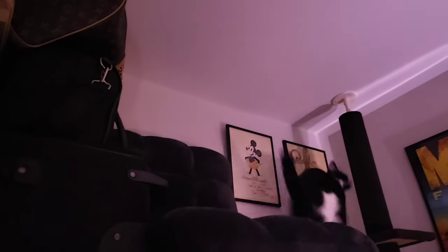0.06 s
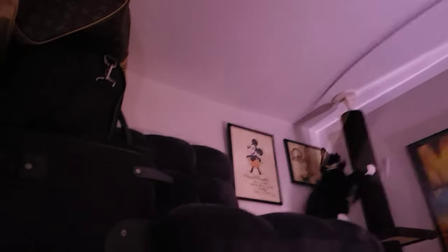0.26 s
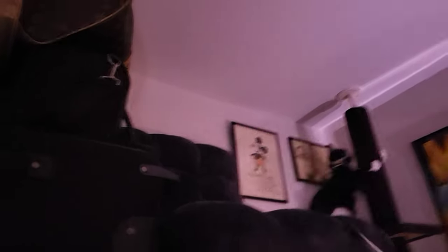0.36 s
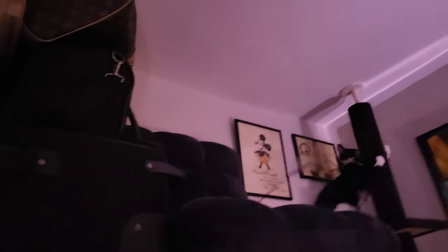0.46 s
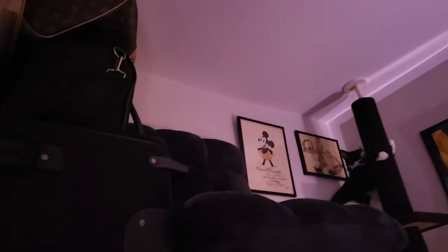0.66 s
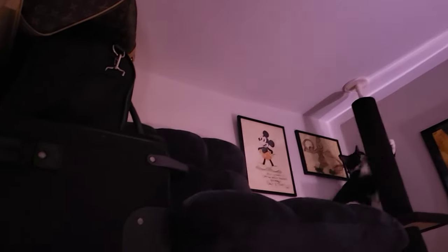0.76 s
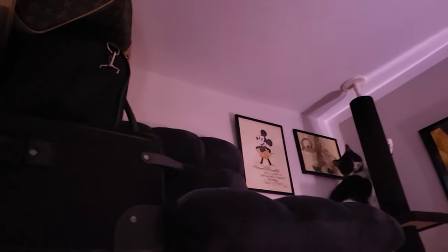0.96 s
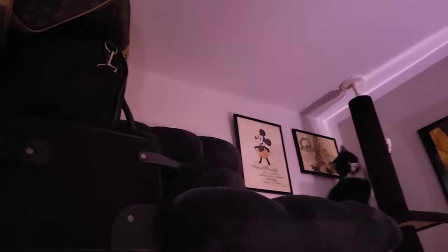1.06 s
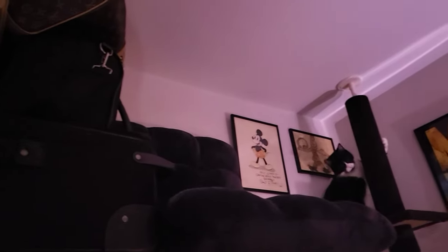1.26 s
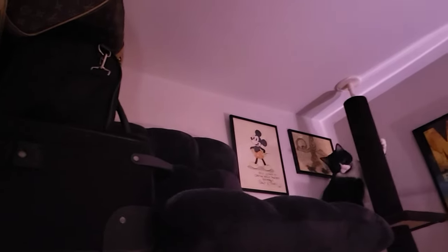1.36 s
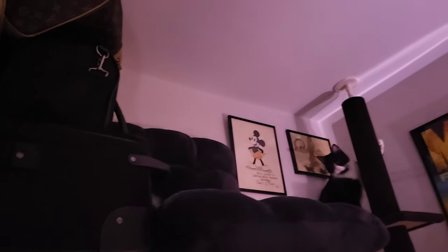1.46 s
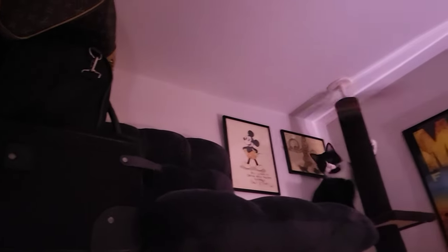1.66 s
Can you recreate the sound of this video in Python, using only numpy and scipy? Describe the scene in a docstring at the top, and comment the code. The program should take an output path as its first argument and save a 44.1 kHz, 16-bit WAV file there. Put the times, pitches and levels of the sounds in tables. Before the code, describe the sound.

A cat's paw knocks hard on a carpeted pole, then light claw taps and a scrape

```python
"""Steady room noise and a wavering hum (filtered noise) lie under a cat on a sofa back in a living room.
First come faint claw ticks (ringing clicks), then one hard knock on a carpeted pole (driven damped modes).
Low thumps (swelling sines) and dull noise bands follow as pole and sofa sway and the cat's weight shifts;
fur and cloth rustle (grainy noise), claws tick again and light taps ring a hollow part (damped modes).
Late on comes a short scrape (grainy noise with ringing catches). Two microphones hear it all."""
import sys
import numpy as np
from scipy import signal
from scipy.fft import rfft, irfft, next_fast_len
from scipy.io import wavfile

SR = 44100
rng = np.random.default_rng(int(sys.argv[2]) if len(sys.argv) > 2 else 0)


def generate_wav(sig):
    """Save sig (samples, or channels by samples) to the path in sys.argv[1] as 16-bit PCM at SR."""
    pcm = np.round(np.clip(np.atleast_2d(sig).T, -1, 1) * 32767).astype(np.int16)
    wavfile.write(sys.argv[1], SR, pcm)


def ratio_of_db(decibels):
    """Turn decibels (scalar or array-like) into linear amplitude factors; 0 dB maps to 1."""
    return 10 ** (np.asarray(decibels, float) / 20)


N = 74970

# spectrum of the room noise: f/Hz, relative level/dB
HUSH_SPECTRUM = [(18, -41), (30, 10.5), (48, -1), (93, -27.5), (137, -3.5), (173, -25), (225, -31.5),
                 (401, -12), (495, -33), (714, -22), (1240, -44.5), (1370, -27.5), (1610, -48.5),
                 (2320, -33.5), (7540, -46), (8600, -47.5), (15700, -40)]
# likeness of the room noise at the two microphones: f/Hz, left-right correlation/1
HUSH_LIKENESS = [(60, -0.12), (180, -0.15), (550, -0.86), (1650, 0.68), (4970, -0.24), (15000, -0.82)]
# resonances of the hum: f/Hz, rms level/dB, bandwidth/Hz
HUM = [(39, -70, 7), (134, -70, 6)]
# weight shifting in the cushions: t/s, bass level before trim/dB, low middle level before trim/dB
WEIGHT = [(0.0, -102, -52.5), (0.074, -83, -67), (0.112, -68.5, -101), (0.157, -55, -43.5),
          (0.196, -68, -52.5), (0.218, -30, -25), (0.264, -29, -37.5), (0.287, -33, -38),
          (0.364, -46, -67.5), (0.404, -48, -42), (0.448, -83, -71.5), (0.506, -58, -83.5),
          (0.572, -43, -51), (0.65, -62.5, -99), (0.688, -39, -53.5), (0.718, -47.5, -55),
          (0.766, -57.5, -64), (0.891, -81.5, -70.5), (1.102, -70, -79.5), (1.13, -79, -53.5),
          (1.178, -74, -71), (1.496, -63.5, -81), (1.551, -44.5, -49.5), (1.595, -57, -50),
          (1.666, -83, -72), (1.7, -69, -91)]
# low swings of pole and sofa frame: centre t/s, length/s, peak level/dB, f/Hz
SWAYS = [(0.01, 0.082, -47, 39.6), (0.045, 0.046, -56, 119), (0.07, 0.031, -46, 51),
         (0.164, 0.015, -51, 308), (0.23, 0.029, -32, 229), (0.244, 0.034, -32.5, 108),
         (0.252, 0.02, -22, 59), (0.276, 0.047, -19, 49.6), (0.285, 0.036, -35, 246),
         (0.288, 0.028, -31.5, 106), (0.319, 0.057, -46.5, 234), (0.347, 0.072, -27, 41.6),
         (0.403, 0.047, -46.5, 273.5), (0.418, 0.023, -40.5, 45), (0.457, 0.018, -60.5, 287),
         (0.565, 0.021, -49, 146), (0.595, 0.079, -53.5, 128), (0.597, 0.22, -46.5, 41.6),
         (0.63, 0.046, -66, 130.6), (0.689, 0.02, -53, 328.4), (0.721, 0.1, -51, 103.7),
         (0.764, 0.079, -60, 284), (0.776, 0.078, -57, 45), (0.84, 0.15, -69, 355.4),
         (1.127, 0.014, -59, 410), (1.142, 0.025, -70, 387), (1.564, 0.062, -61, 111)]
# faint creaks: centre t/s, length/s, peak level/dB, f/Hz
CREAKS = [(.546, .02, -64, 780), (.562, .025, -63, 600), (1.137, .03, -74, 2300), (1.3, .05, -76, 700),
          (1.315, .08, -75, 1400), (1.42, .06, -80, 750)]
# fur and cloth rubbing: t/s, middle level/dB, top level/dB, treble level/dB
RUB = [(0, -75.5, -91, -94), (.02, -66.5, -61.5, -76), (.04, -74.5, -68, -71), (.075, -84, -82.5, -85),
       (.14, -78, -80, -88), (.157, -64, -73.5, -80.5), (.211, -54.5, -56.5, -71.5),
       (.222, -26.5, -38, -61.5), (.245, -39, -53.5, -63), (.29, -47.5, -54, -68), (.31, -65.5, -70.5, -81),
       (.355, -64, -67, -93), (.378, -66.5, -72.5, -90.5), (.395, -63, -65, -73.5),
       (.43, -74, -88.5, -87.5), (.55, -68, -85, -89.5), (.575, -76.5, -97.5, -98),
       (.65, -76.5, -82.5, -79), (.69, -73.5, -71, -80), (.73, -72, -80, -74.5), (.755, -60.5, -66, -69.5),
       (.81, -86, -100, -100), (1.1, -86, -99, -104), (1.122, -63, -78.5, -94), (1.175, -90, -100, -102),
       (1.3, -79, -88.5, -89), (1.5, -81, -80.5, -80.5)]
# spectra of the rubbing in its middle, top and treble: f/Hz, relative level/dB per Hz
RUB_MIDDLE = [(240, -33), (400, -18.5), (671, 0.5), (900, -1), (1500, 5), (2400, 4), (3500, -3),
              (4550, -34), (7700, -120)]
RUB_TOP = [(1760, -35.5), (3000, -19), (3780, -0.5), (4360, -9.5), (8500, -16), (11000, -47.5),
           (18700, -120)]
RUB_TREBLE = [(4710, -28), (8000, -3), (10100, -12.5), (14800, -7), (16000, -18.5)]
# the scrape: t/s, middle level/dB, top level/dB, treble level/dB
SCRAPE = [(1.508, -76, -91, -101), (1.5168, -58, -60, -73.5), (1.518, -40, -45, -53),
          (1.528, -46, -40, -57.5), (1.532, -51, -42, -53), (1.557, -47.5, -49, -47.5),
          (1.569, -43, -48.5, -47.5), (1.58, -54.5, -48.5, -59), (1.587, -47, -55.5, -50),
          (1.6, -58.5, -55.5, -54.5), (1.63, -71, -65.5, -70), (1.67, -116, -103, -99)]
# spectra of the scrape in its middle, top and treble: f/Hz, relative level/dB per Hz
SCRAPE_MIDDLE = [(150, -18.5), (250, -20), (606, -6.5), (774, -9), (1600, -1), (2090, -1.5), (2970, 2.5),
                 (3200, -17), (4160, -50.5), (7040, -120)]
SCRAPE_TOP = [(2000, -29), (3100, -6.5), (4000, -0.5), (5100, -6.5), (6100, -9), (8500, -20.5),
              (11000, -39.5)]
SCRAPE_TREBLE = [(4710, -37), (8000, -6.5), (9210, -10), (10100, -10.5), (13500, 2.5), (15700, -4)]
# catches in the scrape: t/s, peak level/dB, f/Hz, decay time t60/s
CATCHES = [(1.5176, -40, 3500, .012), (1.521, -40, 2500, .015), (1.5244, -29, 3750, .016),
           (1.5246, -37, 6000, .012), (1.525, -39, 2450, .015), (1.535, -42, 1200, .02),
           (1.543, -42, 1250, .02), (1.561, -41, 3300, .015), (1.5645, -41, 1700, .02),
           (1.568, -38, 1450, .022), (1.5838, -36, 1600, .025), (1.587, -41, 1500, .025),
           (1.592, -42, 1900, .025), (1.612, -50, 1800, .025)]
# light taps on a hollow part: t/s, level/dB, then the relative level/dB of each tap mode
TAPS = [(0.597, -67.5, -20, -8, -6.5, 4.5, -12.5), (0.6779, -57.5, -20, -17, -3.5, -13.5, -11),
        (0.7025, -52, -26.5, -19, -15, -1.5, -1.5), (0.7365, -44, -9, -4.5, -9.5, -8.5, 0),
        (0.7554, -59.5, -24, 4.5, -17, -16, -11), (1.119, -60, -3, -41, 1, 5.5, 5.5)]
# modes of the hollow part: f/Hz, decay time t60/s
TAP_MODES = [(775, 0.036), (1160, 0.022), (1335, 0.047), (1560, 0.031), (2120, 0.019)]
# claw ticks: t/s, level/dB, f/Hz
TICKS = [(0.021, -40, 5600), (0.028, -45.5, 7800), (0.032, -52, 9400), (0.402, -51.5, 13400),
         (0.6527, -61.5, 11860), (0.6646, -37, 12500), (0.674, -39, 11020), (0.7012, -53, 13000),
         (0.7093, -53, 11200), (0.736, -52, 13850), (0.7527, -46.5, 12070), (0.7744, -63, 13500),
         (0.8372, -66, 11870), (1.121, -81, 11880)]
# small body under each tick: f/Hz, level relative to the tick/dB, decay time t60/s
TICK_BODY = [(3400, -19, .022), (5800, -22, .005), (15000, -8, .0025)]
# knocks on the pole: t/s, level/dB, contact build-up/s, favoured f/Hz
KNOCKS = [(0.016, -56, 0.0016, 780), (0.152, -56.5, 0.0031, 900), (0.2141, -9, 0.0011, 1400),
          (0.383, -43, 0.0015, 794), (0.946, -73.5, 0.0025, 2300)]
# modes of the pole: f/Hz, relative level/dB, decay time t60/s
POLE_MODES = [(790, -12, .025), (1030, -1, .024), (1165, -2, .028), (1325, 0, .034), (1575, 1, .028),
              (1755, -2, .025), (2150, -7, .02), (2550, -5, .014), (3280, -1, .013), (3500, 0, .011),
              (3950, -5, .009), (5000, -14, .008), (5800, -13, .009), (6700, -15, .008)]


def rms_one(x):
    """Normalisation: scale a signal to unit rms."""
    return x / np.sqrt(np.mean(x ** 2) + 1e-20)


def in_time(rows):
    """Linear interpolation: read each column of a time table at every sample."""
    s, *columns = np.transpose(rows)
    return [np.interp(np.arange(N) / SR, s, column) for column in columns]


def at_hz(points, hz):
    """Interpolation of a spectrum table on a logarithmic frequency axis."""
    table_hz, values = np.transpose(points)
    return np.interp(np.log(hz), np.log(table_hz), values)


def bin_hz():
    """Frequencies of the Fourier bins, the lowest raised to 1 Hz."""
    return np.maximum(np.arange(N // 2 + 1) * SR / N, 1)


def colour(x, spectrum):
    """Linear filtering: weight the Fourier spectrum, then scale to unit rms."""
    return rms_one(irfft(rfft(x) * ratio_of_db(at_hz(spectrum, bin_hz())), N))


def band_filter(x, order, edges_hz, kind):
    """Butterworth filtering: a maximally flat pass band."""
    return signal.sosfilt(signal.butter(order, edges_hz, kind, fs=SR, output="sos"), x)


def ring(x, hz, t60):
    """Damped resonator: a unit click sets a decaying sine of initial height 1 ringing."""
    r, w = ratio_of_db(-60 / (t60 * SR)), 2 * np.pi * hz / SR
    return signal.lfilter([0, np.sin(w)], [1, -2 * r * np.cos(w), r * r], x + 1e-18)


def contact(t, build_s):
    """Contact force of an impact: quick rise to 1, quick fall."""
    return (t / build_s * np.exp(1 - t / build_s)) ** 2


def push_ring(push, t, hz, t60):
    """Driven resonance: a mode swells during the contact, then decays; peak 1, random phase."""
    drive = push * np.sin(2 * np.pi * (hz * t + rng.random()))
    y = ring(drive, hz, t60)
    return y / np.abs(y).max()


def click(s, db):
    """Impulse excitation: one sample of the given level."""
    return ratio_of_db(db) * (np.arange(N) == int(s * SR))


def grains(per_s, spread_db, bed):
    """Stick-slip friction: random clicks of uneven size over a bed of noise."""
    sizes = ratio_of_db(spread_db * np.minimum(rng.exponential(1, N), 5)) * rng.choice([-1, 1], N)
    slips = rng.random(N) < per_s / SR
    return rms_one(sizes * slips) + bed * rng.standard_normal(N)


def rustle(curve, spectra, per_s, spread_db):
    """Friction noise: independent grains in the middle, top and treble, each with its own level curve."""
    return sum(ratio_of_db(db) * colour(grains(per_s, spread_db, bed=.75), spectrum)
               for db, spectrum in zip(in_time(curve), spectra))


def swells(rows):
    """Amplitude modulation: each sine swells and fades under a squared cosine."""
    t = np.arange(N) / SR
    out = np.zeros(N)
    for s, length_s, db, hz in rows:
        swell = np.cos(np.pi * np.clip((t - s) / length_s, -.5, .5)) ** 2
        out += ratio_of_db(db) * swell * np.sin(2 * np.pi * hz * (t - s))
    return out


def pair(x, lag_s, pan_db):
    """Arrival-time and level difference: positive values make the left later and louder."""
    t = np.arange(N)
    left = np.interp(t - lag_s * SR, t, x)
    return np.array([left * ratio_of_db(pan_db / 2), x * ratio_of_db(-pan_db / 2)])


def hush():
    """Partial coherence: steady noise with a set left-right likeness, plus a hum of resonated noise."""
    level_db = -64.5
    mid, side = rfft(rng.standard_normal((2, N)))
    alike = np.clip(at_hz(HUSH_LIKENESS, bin_hz()), -1, 1)
    both = np.sqrt(1 + alike) * mid + np.sqrt(1 - alike) * side * [[1], [-1]]
    noise = rms_one(irfft(both * ratio_of_db(at_hz(HUSH_SPECTRUM, bin_hz())), N))
    # a narrow resonance driven by noise wavers in level
    hum = sum(ratio_of_db(db) * rms_one(ring(rng.standard_normal(N), hz, 0.81 / width_hz))
              for hz, db, width_hz in HUM)
    return ratio_of_db(level_db) * noise + hum


def room(x):
    """Reverberation: ten feedback delays a side, duller on every round."""
    t60_s, wall_cut_hz = 0.16, 4000
    size = next_fast_len(N + SR)
    w = 2 * np.pi * np.arange(size // 2 + 1) / size
    dull = 1 / (1 + 1j * w * SR / (2 * np.pi * wall_cut_hz)) ** 0.1
    out = np.zeros((2, len(w)), complex)
    for k, lag in enumerate(rng.uniform(0.0033, 0.033, 20) * SR):
        loop = ratio_of_db(-60 * lag / SR / t60_s) * dull * np.exp(-1j * w * lag)
        out[k % 2] += loop / (1 - loop) * (-1) ** (k // 2)  # alternate signs
    return irfft(out * rfft(x, size), size)[:, :N]


def weight():
    """Band-limited noise: dull lumps from the upholstery as the cat's weight shifts."""
    trim_db, bands_hz = -11, ([60., 154.0], [180., 424.0])
    return sum(ratio_of_db(db + trim_db) * rms_one(band_filter(rng.standard_normal(N), 2, edges_hz, "band"))
               for db, edges_hz in zip(in_time(WEIGHT), bands_hz))


def sways():
    """Low-frequency oscillation: pole and sofa frame swing in short swells."""
    return swells(SWAYS)


def creaks():
    """Tonal bursts: faint creaks swell and fade."""
    return swells(CREAKS)


def rub():
    """Dry friction: fur and cloth give a grainy rustle."""
    return rustle(RUB, (RUB_MIDDLE, RUB_TOP, RUB_TREBLE), per_s=2500, spread_db=3.5)


def scrape():
    """Friction with resonance: one grainy stroke whose louder catches ring."""
    contact_s, fade_in_s = .0006, .004
    out = rustle(SCRAPE, (SCRAPE_MIDDLE, SCRAPE_TOP, SCRAPE_TREBLE), per_s=2000, spread_db=3.0)
    t = np.arange(2000) / SR
    for s, db, hz, t60 in CATCHES:
        i = int(s * SR)
        out[i:i + len(t)] += ratio_of_db(db) * push_ring(contact(t, contact_s), t, hz, t60)
    start_s = SCRAPE[0][0]
    return out * in_time([(start_s - fade_in_s, 0), (start_s, 1)])[0]


def taps():
    """Modal excitation: a soft contact rings a few clear modes, with a faint noisy snap of the claw."""
    contact_s, snap_db = .0009, -6
    out, t = np.zeros(N), np.arange(4000) / SR
    push = contact(t, contact_s)
    for s, db, *strengths in TAPS:
        body = sum(ratio_of_db(d) * push_ring(push, t, hz, t60) for d, (hz, t60) in zip(strengths, TAP_MODES))
        snap = ratio_of_db(snap_db) * push * rng.standard_normal(len(t))
        i = int(s * SR)
        out[i:i + len(t)] += ratio_of_db(db) * (body + snap)
    return out


def ticks():
    """Impulse response: claw tips catch on the carpet, a bright ringing click with a small body."""
    out = np.zeros(N)
    for s, db, hz in TICKS:
        out += ring(click(s, db), hz, t60=.0022)
        out += sum(ring(click(s, db + d), body_hz, t60) for body_hz, d, t60 in TICK_BODY)
    return out


def knocks():
    """Modal excitation: a few ms of contact drive pole modes near a favoured pitch, with a short crack."""
    fall_db_per_oct, scatter_db = 1.5, 2.0
    crack_db, crack_s, pole_cut_hz = -31, .004, 720
    out, t = np.zeros(N), np.arange(6000) / SR
    for s, db, build_s, pitch_hz in KNOCKS:
        noise = rng.standard_normal(len(t))
        crack = np.diff(noise, prepend=0) * np.exp(-t / crack_s)
        push = contact(t, build_s)
        body = np.zeros(len(t))
        for hz, d, t60 in POLE_MODES:
            octaves_off = abs(np.log2(hz / pitch_hz))
            mode_db = d - fall_db_per_oct * octaves_off + scatter_db * rng.standard_normal()
            body += ratio_of_db(mode_db) * push_ring(push, t, hz, t60)
        i = int(s * SR)
        out[i:i + len(t)] += ratio_of_db(db) * (body / np.abs(body).max() + ratio_of_db(crack_db) * crack)
    return band_filter(out, 4, pole_cut_hz, "high")


def scene():
    """Superposition: direct sounds and room sum; separate draws make the two sides partly unlike."""
    room_db, tick_room_db = -18, -16  # the ticks' own factor comes on top of the room's
    shared_rub, left_rub = rub(), rub()
    cat, claws, late = knocks() + taps() + shared_rub, ticks(), scrape()
    left_only = 0.83 * left_rub + 0.75 * (knocks() + scrape())
    opposed = 0.25 * weight()  # opposite sign on the two sides
    low = sways() + creaks() + weight()
    direct = (pair(cat, lag_s=.00017, pan_db=1.5) + pair(claws, lag_s=.00008, pan_db=1.5)
              + pair(low, lag_s=.00035, pan_db=0) + pair(late, lag_s=-.00011, pan_db=4.0))
    echoes = ratio_of_db(room_db) * room(cat + late + ratio_of_db(tick_room_db) * claws)
    return direct + left_only * [[1], [0]] + opposed * [[1], [-1]] + echoes + hush()


def band_limit(x):
    """A steep low-pass at the top of the band."""
    return signal.sosfilt(signal.butter(12, 15800, fs=SR, output="sos"), x)


def record(dry):
    """High-pass response: the microphones drop the deepest bass."""
    mix = band_filter(dry, 2, 32, "high")
    return band_limit(mix)


dry = scene()
out = record(dry)
generate_wav(out)
```